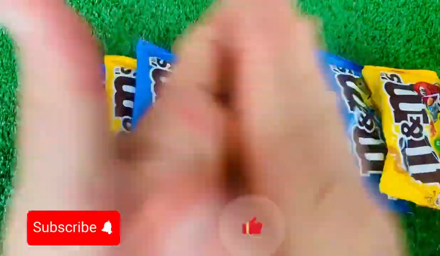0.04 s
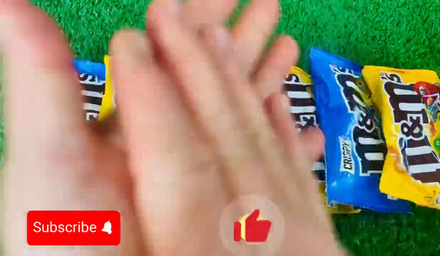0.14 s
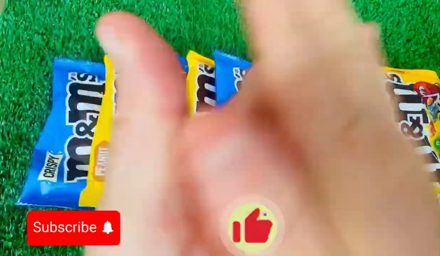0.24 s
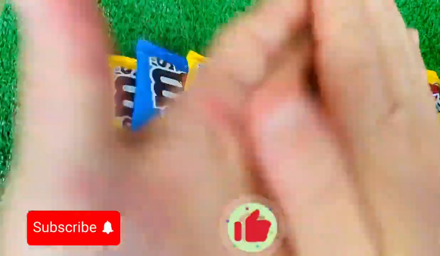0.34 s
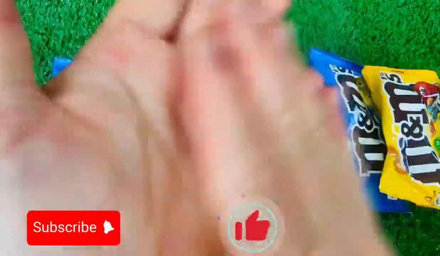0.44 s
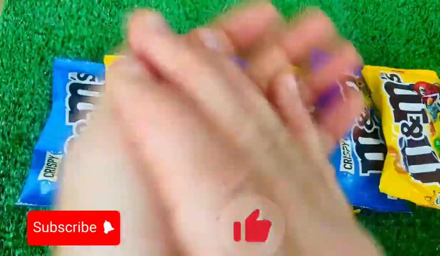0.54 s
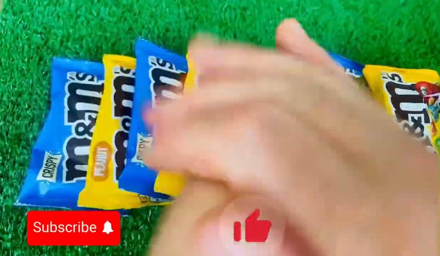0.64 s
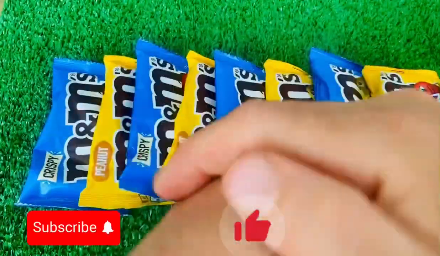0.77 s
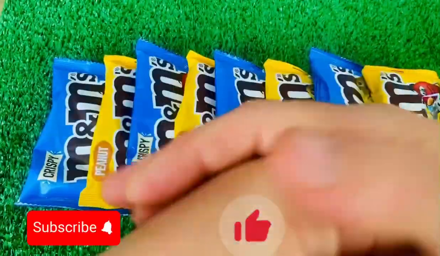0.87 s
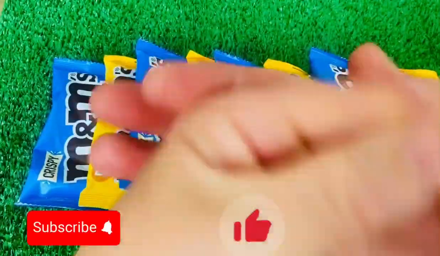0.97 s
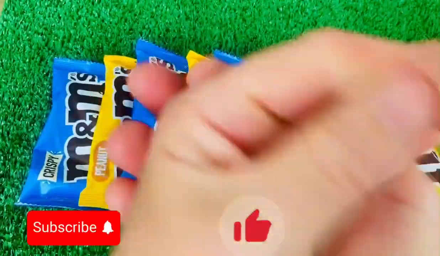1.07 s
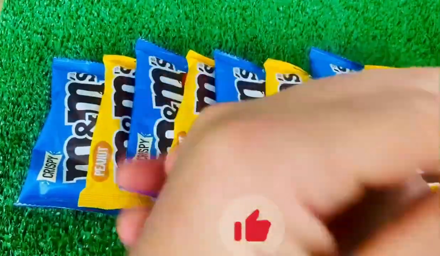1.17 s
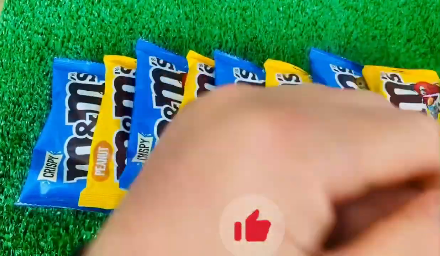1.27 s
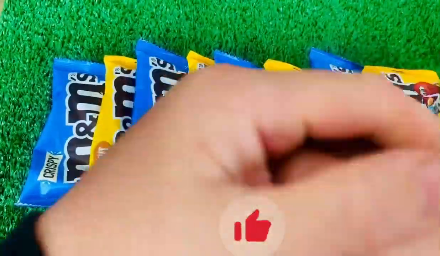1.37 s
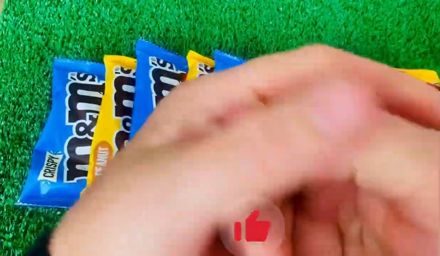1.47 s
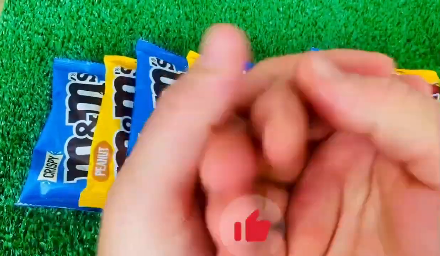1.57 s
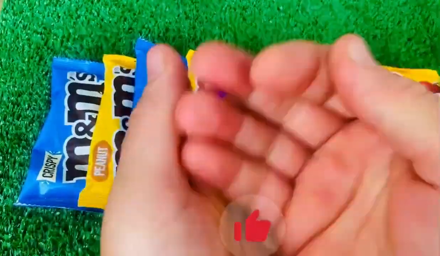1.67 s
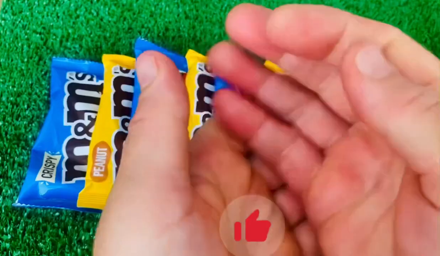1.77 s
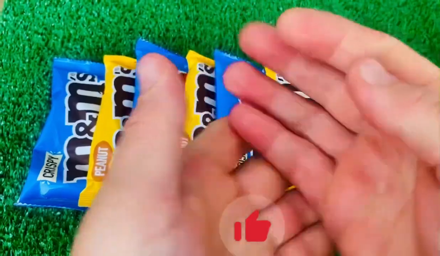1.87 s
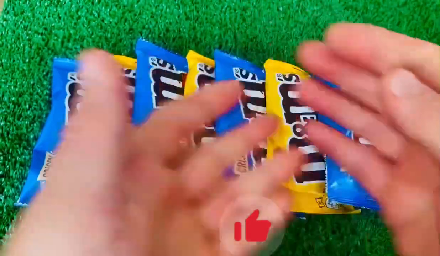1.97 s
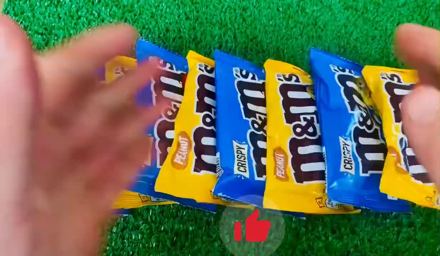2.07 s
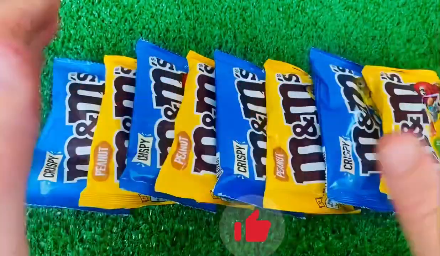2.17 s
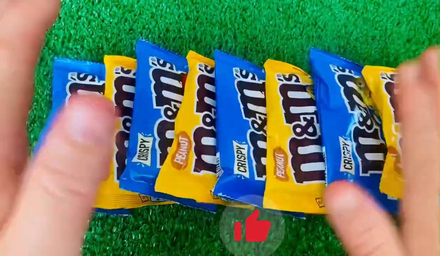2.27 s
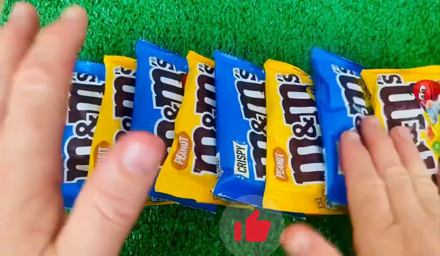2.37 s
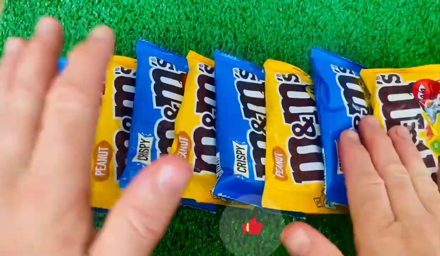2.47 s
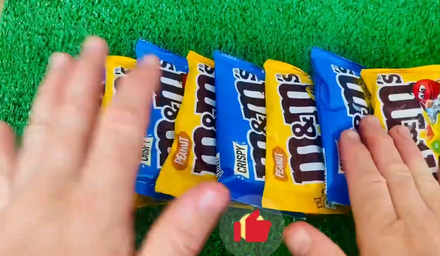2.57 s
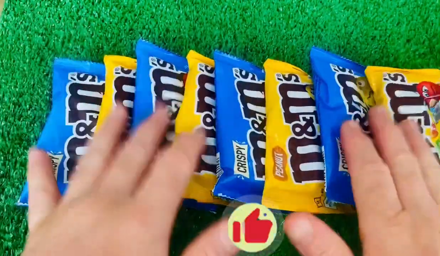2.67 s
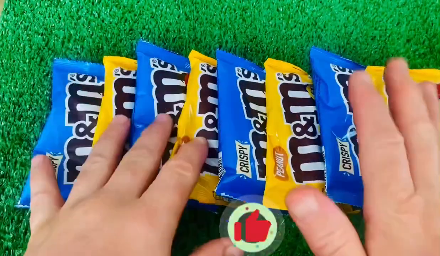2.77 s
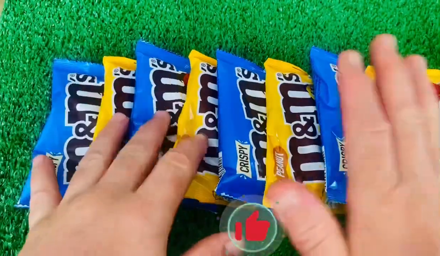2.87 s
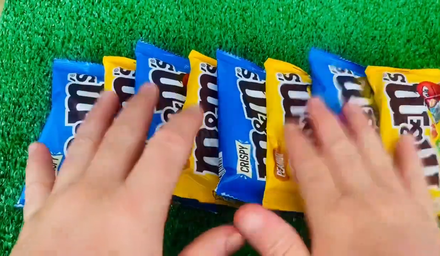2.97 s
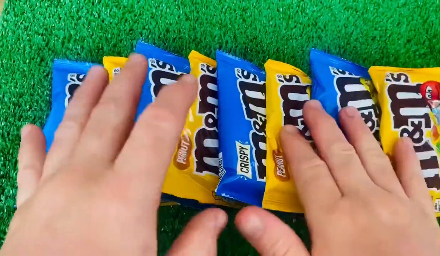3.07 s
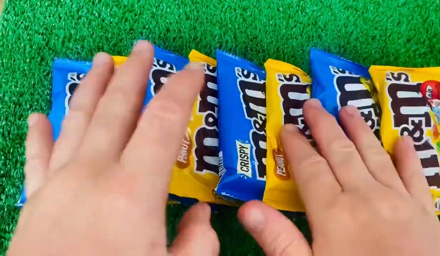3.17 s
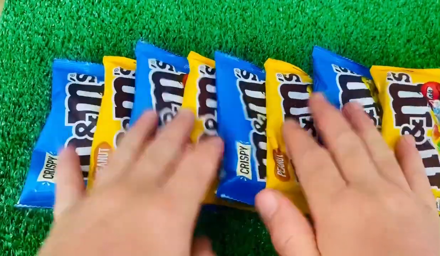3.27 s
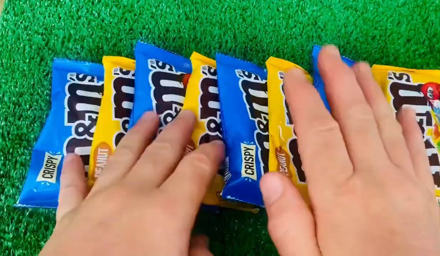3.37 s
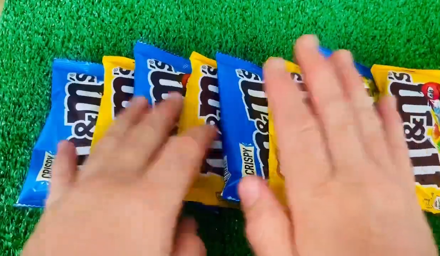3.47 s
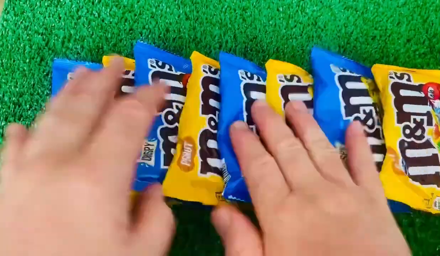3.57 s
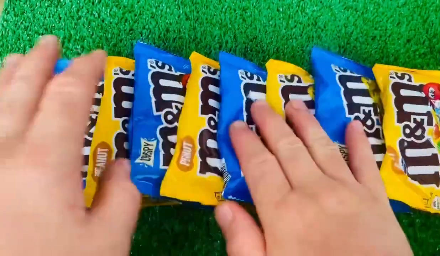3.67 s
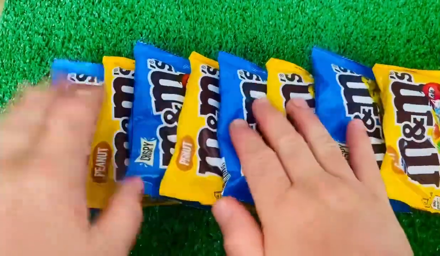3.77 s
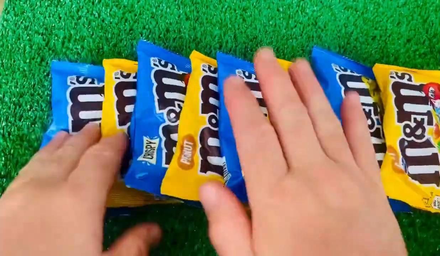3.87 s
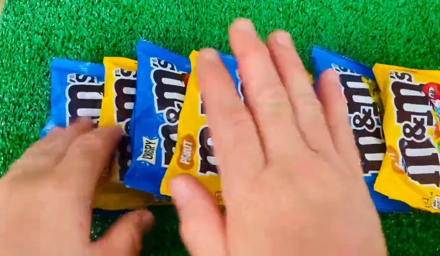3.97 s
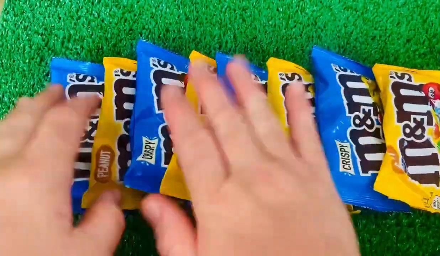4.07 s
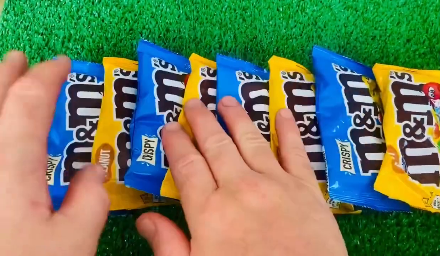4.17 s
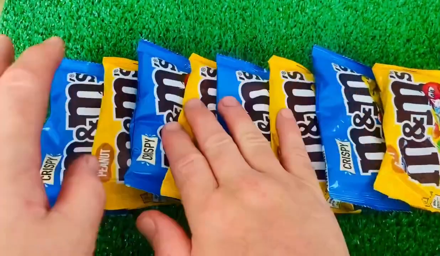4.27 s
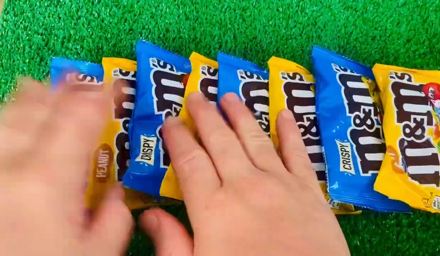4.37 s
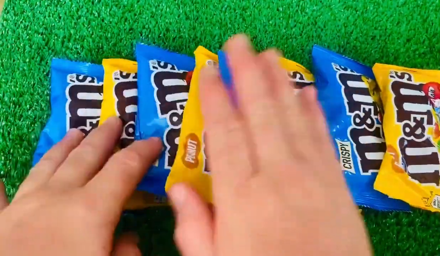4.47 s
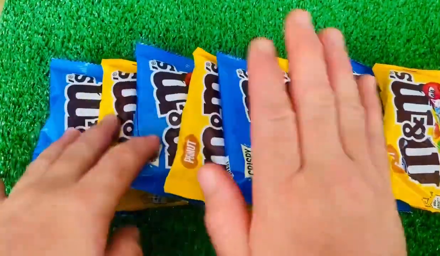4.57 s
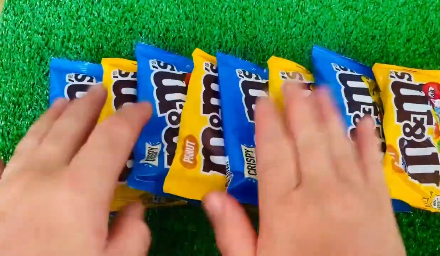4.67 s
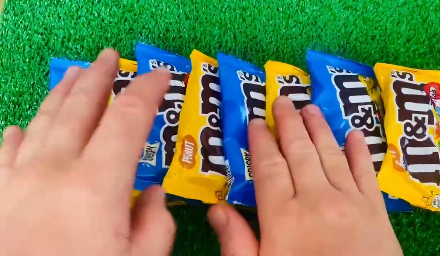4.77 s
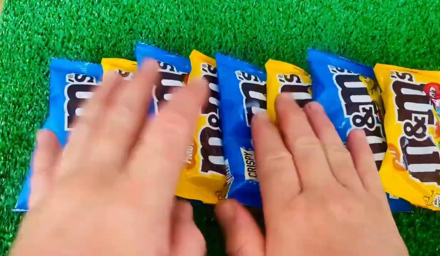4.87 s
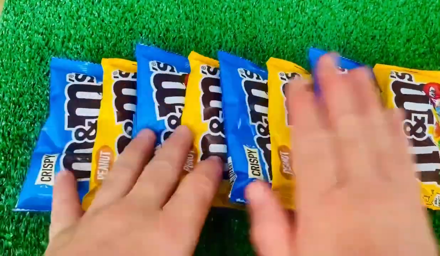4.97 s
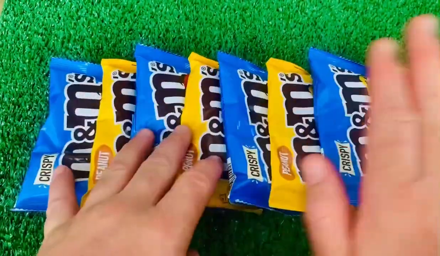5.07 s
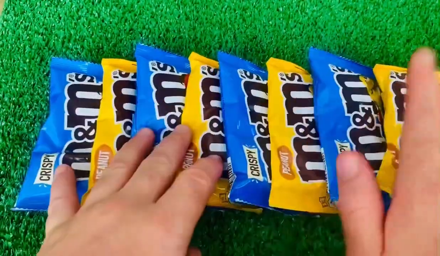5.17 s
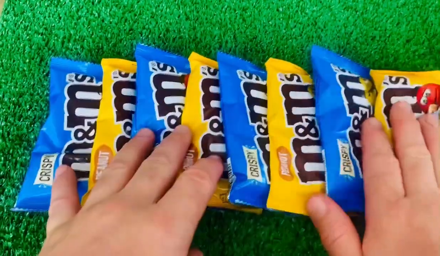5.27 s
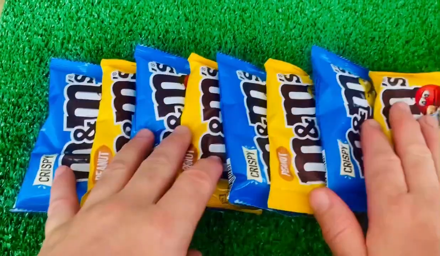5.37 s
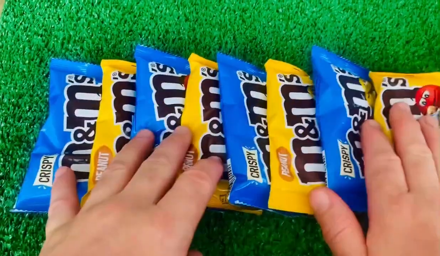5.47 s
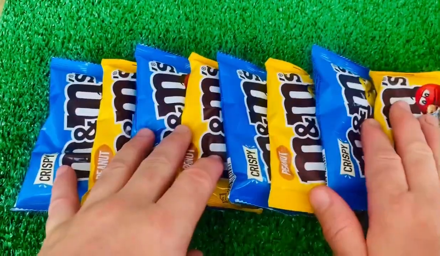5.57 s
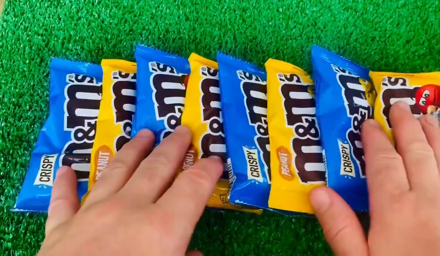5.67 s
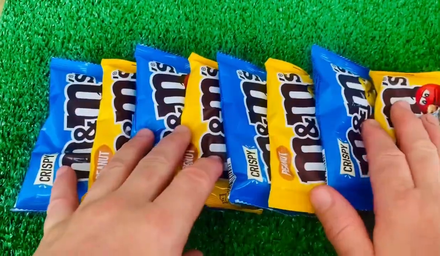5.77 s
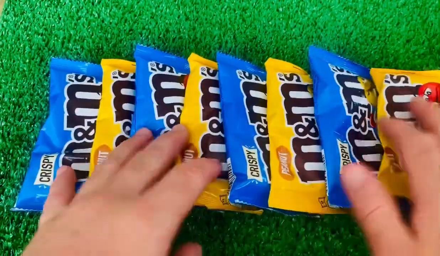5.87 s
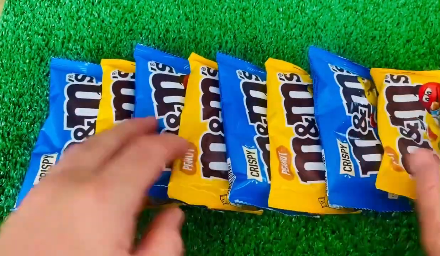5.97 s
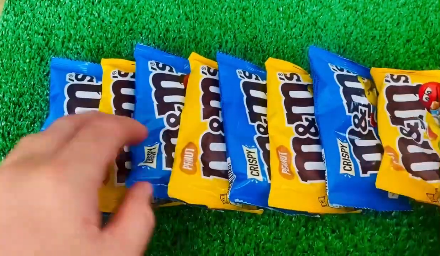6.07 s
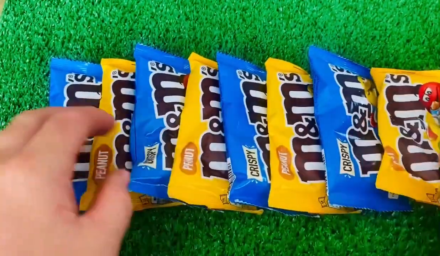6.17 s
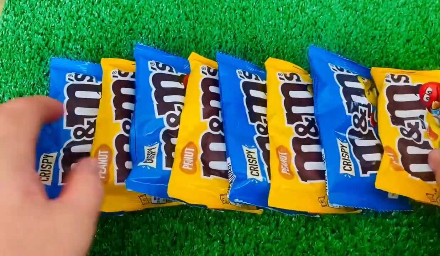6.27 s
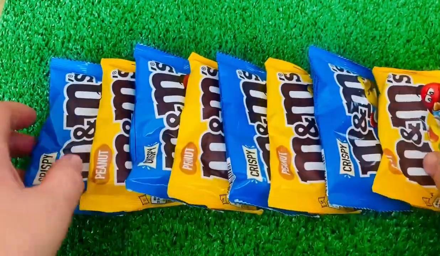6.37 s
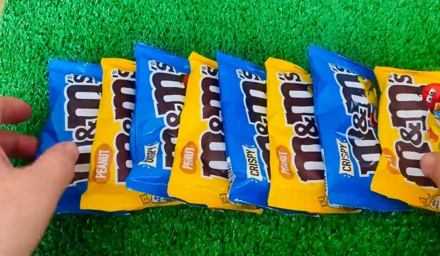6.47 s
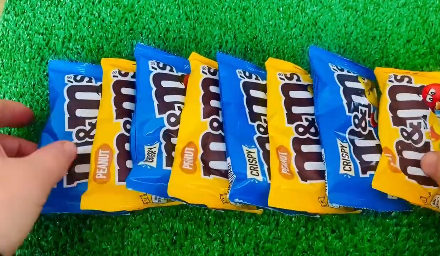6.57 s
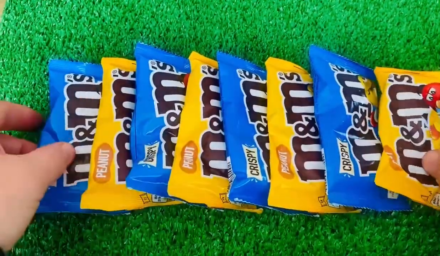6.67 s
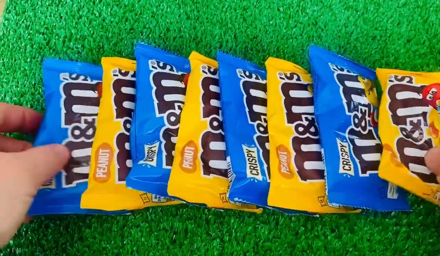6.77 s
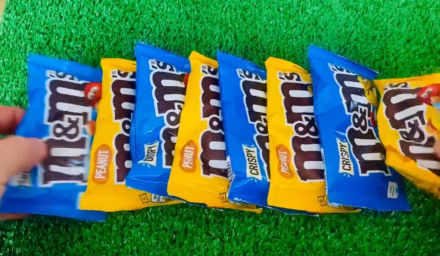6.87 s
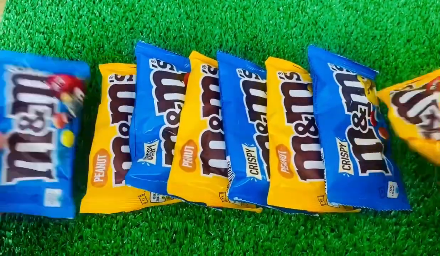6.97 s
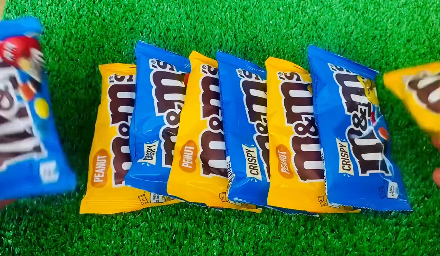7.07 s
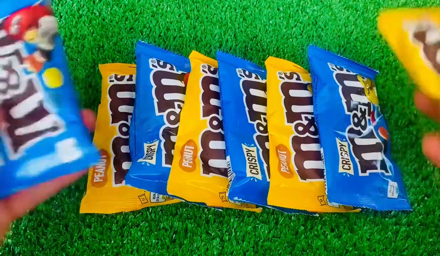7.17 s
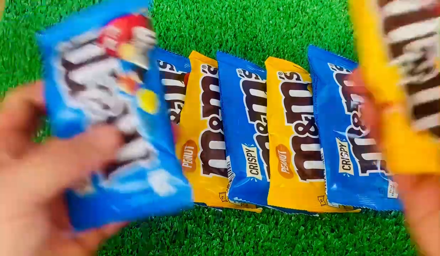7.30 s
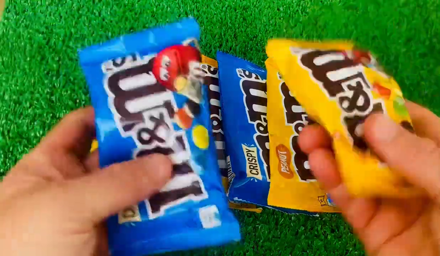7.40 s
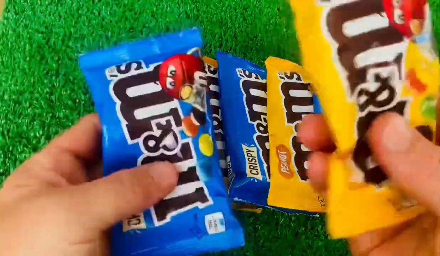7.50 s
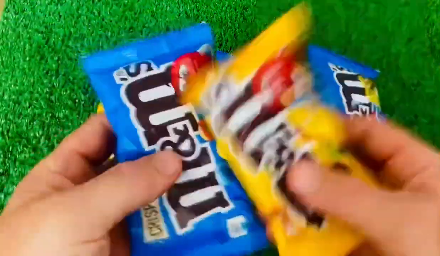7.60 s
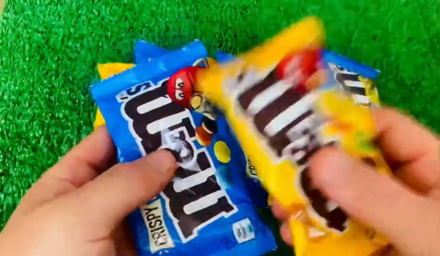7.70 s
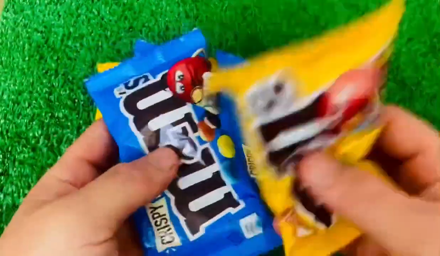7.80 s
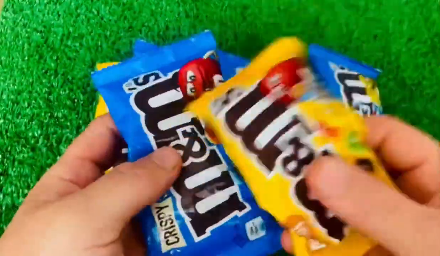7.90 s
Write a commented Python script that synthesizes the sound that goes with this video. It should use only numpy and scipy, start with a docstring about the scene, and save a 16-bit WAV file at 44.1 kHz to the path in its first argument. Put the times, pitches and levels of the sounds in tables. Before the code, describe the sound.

Soft skin-on-skin strokes come first, whispery and irregular, fading over two seconds. Next comes an even run of short, bright pats on filled plastic packets, with sweets clicking and film snapping between them. The patting stops and only tiny crinkles and a faint soft bump remain. Finally the film rustles densely as packets are picked up, and a few strong crunchy shakes end it. Intimate stereo pickup, small dry room, low room tone.

```python
"""First two palms rub together close to a stereo microphone: hissing noise, ringing in the hollow between the hands.
Then they pat a row of plastic candy packets on a soft mat. Each pat is a burst of tiny clicks ringing the film,
and the sweets inside clack as short fading tones. Between pats the film crinkles and snaps with more such clicks.
At the end two packets are picked up and shaken. Soft knocks, puffs of air, a short room tail and
a quiet room tone, all made from shaped noise, surround the hands."""
import sys
import numpy as np
from scipy import signal
from scipy.fft import rfft, irfft, next_fast_len
from scipy.io import wavfile

SR = 44100
rng = np.random.default_rng(int(sys.argv[2]) if len(sys.argv) > 2 else 0)


def materialize(psi):
    """Save the field psi as 16-bit PCM at rate SR to the path in sys.argv[1].

    A 1-D psi becomes a single channel; in a 2-D psi each row is a channel.
    """
    bounded = np.clip(np.atleast_2d(psi).T, -1, 1)
    quanta = np.round(bounded * 32767).astype(np.int16)
    wavfile.write(sys.argv[1], SR, quanta)


N = 350154  # length in samples

# pats and shakes of a packet: start_s, crush_length_s, level_db, brightness_db (above 8 kHz against below 2 kHz,
# fading after the crush), body_db (lift below 450 Hz), pouch_ring_hz, second_ring_hz
PATS = [(2.372, 0.027, -25, 2, -6, 1280, 850), (2.699, 0.018, -20, 8.5, -1.5, 1450, 300),
        (2.998, 0.01, -15, 2.5, 0.5, 1390, 880), (3.295, 0.014, -19.5, 3.5, 3, 1290, 420),
        (3.583, 0.014, -18, 1.5, -3.5, 1603, 400), (3.831, 0.012, -20, 7.5, 1.5, 1319, 430),
        (4.132, 0.012, -18.5, 7.5, -3, 1260, 370), (4.434, 0.0095, -17.5, 11.5, 1.5, 1299, 330),
        (4.714, 0.01, -15, 3, -0.5, 1906, 390), (4.968, 0.013, -22, 2, 0.5, 1241, 410),
        (5.251, 0.021, -17.5, 4, -3, 2032, 270), (6.749, 0.0094, -23, 12, -2, 2038, 350),
        (7.41, 0.012, -23.5, -1, -7.5, 1330, 400), (7.638, 0.014, -12, 7, 0, 1050, 2318),
        (7.885, 0.019, -14, 2, -2, 2330, 245)]
# tone of a pat: pitch_hz, relative_level_db (per Hz)
PAT_COLOUR = [(100, -8), (200, -2), (350, -2.5), (500, -2.5), (680, -9.5), (950, -2), (1400, -0.5),
              (2100, 0), (3000, -8), (6000, -7.5), (10000, -13), (16000, -21)]


def pats(patchy_db, pouch_db, pouch_octaves, second_db):
    """The packet gives way in a clustered burst of folds, coloured by two rings of the pouch."""
    at, sizes = grains(per_s=4500, spread_db=3.0)
    sizes = sizes * rms_one(from_db(2 * drift(150)))[at]
    power = np.zeros(len(at)) + 1e-18
    tint = np.zeros((len(at), len(FACETS_HZ)))
    for start, length, level_db, bright_db, body_db, pouch_hz, second_hz in PATS:
        age = at / SR - start
        before, after = np.minimum(age, 0), np.maximum(age - length, 0)
        # the fingers brush the film an instant before they land
        landing = np.maximum(np.exp(before / 0.0013), from_db(-17) * np.exp(before / .004))
        crush = np.maximum(np.exp(-after / 0.0053), from_db(-7.5) * np.exp(-after / .017))
        # the crush is strongest halfway through
        swell_db = 3.0 * (np.sin(np.pi * np.clip(age / length, 0, 1)) - .6)
        burst = (from_db(level_db + swell_db) * landing * crush) ** 2
        # however the folds cluster, the pat delivers the same energy
        burst *= np.sum(burst) * np.mean(sizes ** 2) / np.sum(burst * sizes ** 2)
        # each pouch has two hollow rings, and each spot on it favours facets of its own
        ring_db = 0
        for hz, db in ((pouch_hz, pouch_db), (second_hz, second_db)):
            ring_db = ring_db + db * np.exp(-(np.log2(FACETS_HZ / hz) / pouch_octaves) ** 2)
        spot_db = ring_db + patchy_db * rng.standard_normal(len(FACETS_HZ)) + body_db * BODY
        treble_db = np.outer(bright_db * np.exp(-after / 0.015), TREBLE)
        power += burst
        tint += burst[:, None] * (spot_db + treble_db)
    live = power > 1e-9
    tint_db = (tint / power[:, None])[live]  # overlapping pats share the tint by their power
    strength = (sizes * np.sqrt(power))[live]
    return film(at[live], strength, tint_db, PAT_COLOUR, cycles=18.3, smear_s=.0003)


def sweets(count=6):
    """After each pat a few sweets clack together, each at a pitch of its own near the ring of the pouch."""
    tumble_s, clack_db, fall_db_per_s = .028, -4, 272  # spread of the waits; level against the pat; weakening
    out, t = np.zeros(N + SR), np.arange(SR // 50) / SR
    for start, length, level_db, _, _, pouch_hz, _ in PATS:
        for wait, pitch in rng.standard_normal((count, 2)):
            delay = abs(wait) * tumble_s
            hz = pouch_hz * 2 ** (pitch / 2)
            at = int((start + length + delay) * SR)
            clack = np.sin(2 * np.pi * hz * t) * np.exp(-t * hz / 1.6)
            out[at:at + len(t)] += from_db(level_db + clack_db - fall_db_per_s * delay) * clack
    return out[:N]


# single creases snapping over: start_s, level_db (before gain_db), brightness_db (above 8 kHz against below 2 kHz)
SNAPS = [(2.4093, -25, 9), (2.4442, -28, 1), (2.6782, -29.5, 2), (2.971, -38, -5), (3.0319, -21, 18),
         (3.0758, -32.5, -1), (3.2444, -35, -3.5), (3.3297, -25, 2), (3.3678, -35, -12), (3.3986, -32, 6),
         (3.434, -21.5, -1), (3.4512, -24, 11), (3.4584, -23, -6), (3.6053, -20.5, -8), (3.6131, -21, -10),
         (3.6405, -22.5, 4), (3.657, -25.5, -2), (3.7647, -31.5, -4.5), (3.8515, -18.5, -2),
         (3.9947, -30.5, 6), (4.0631, -33.5, -1), (4.0999, -31.5, -14), (4.2047, -27.5, -10.5),
         (4.3873, -30.5, -2), (4.4013, -30, -1), (4.4746, -22, -28), (4.5295, -25.5, -13),
         (4.5993, -28.5, -2.5), (4.7455, -21, -3.5), (4.8997, -33.5, -9), (4.9291, -23.5, -7.5),
         (5.2803, -16.5, 3), (5.3152, -23.5, -6.5), (5.4399, -33, -7), (5.6146, -57, -25),
         (5.7617, -48, -15.5), (5.7832, -43.5, -30.5), (5.8108, -39.5, -14.5), (5.8385, -29.5, -5),
         (5.8552, -38, 14), (5.8647, -33.5, -13.5), (5.8942, -31, 13.5), (5.9154, -25.5, 5),
         (5.9465, -39, -16), (6.0106, -35, 4), (6.0366, -38.5, -5), (6.062, -38, -8), (6.1645, -41, -16),
         (6.2391, -37.5, -7.5), (6.275, -35, -7), (6.4079, -38, -8), (6.4397, -30, -2), (6.4678, -33, 2),
         (6.4962, -38, 3), (6.6568, -36, -4), (6.7001, -26, 6), (6.7305, -25, 4), (6.7447, -26, 7),
         (6.813, -32, 19), (6.8472, -23, 7), (6.8527, -26, 7), (6.8634, -25, 7), (6.8856, -22.5, 13),
         (6.8993, -21, 15), (6.935, -17.5, 17), (6.945, -26, 3), (6.9746, -30.5, -2), (6.9989, -27, -2),
         (7.0365, -31, -2), (7.0647, -24.5, 4), (7.1136, -22, 8), (7.1381, -22.5, 2), (7.175, -29.5, -2),
         (7.2259, -30, -6), (7.2972, -29, 6), (7.377, -31, -9), (7.385, -25, -8), (7.4434, -28.5, -3),
         (7.4556, -30.5, -6), (7.5437, -26.5, -2), (7.5786, -25, 5), (7.7163, -24, 1), (7.8091, -19, 6),
         (7.8172, -21.5, 6), (7.9168, -17, -6.5)]
# tone of a snap: pitch_hz, relative_level_db (per Hz)
SNAP_COLOUR = [(100, -6.5), (350, 1), (680, -6), (1200, 6), (2500, 1.5), (4000, 1), (7000, 3), (10000, -5),
               (16000, -7)]


def snaps(rows, gain_db, count=3):
    """A crease buckles in a few quick steps, each weaker than the one before."""
    s, level_db, bright_db = np.repeat(np.array(rows), count, axis=0).T
    step = np.arange(len(s)) % count
    late_s = step * 0.00087 * rng.uniform(.6, 1.5, len(s)) - .0002
    # the scale turns a level into the size of a single click
    sizes = from_db(level_db + gain_db - 2.67 * step) * np.sqrt(0.0025 * SR / 2)
    at = ((s + late_s) * SR).astype(int)
    return film(at, sizes, np.outer(bright_db, TREBLE), SNAP_COLOUR, cycles=16, smear_s=.0003)


# tone of the rustle: pitch_hz, relative_level_db (per Hz)
RUSTLE_COLOUR = [(100, -6.5), (300, 3), (480, 2), (680, -4), (1100, 1.5), (2200, 1.5), (3200, -1.5),
                 (6000, -1), (10000, -8), (16000, -19)]


def rustle():
    """Countless small creases: fine when the film settles or slides, a coarse crackle when it is flexed."""
    fine_per_s, flex_per_s = 4000, 850  # creases per second
    level_db, fine = working()
    at, sizes = grains(per_s=flex_per_s * (fine_per_s / flex_per_s) ** fine, spread_db=4.0)
    # creases come in clumps, and the facets that answer keep changing
    sizes = sizes * from_db(level_db[at] + 1.5 * drift(60)[at])
    patches = rng.standard_normal((N // 1024 + 1, len(FACETS_HZ)))[at // 1024]
    # gentle working, below -33 dB, sounds duller
    bright_db = rng.normal(0, 5.2, len(at)) + 0.41 * np.minimum(level_db[at] + 33, 0)
    tint_db = np.outer(bright_db, TREBLE) + 3.35 * patches
    return film(at, sizes, tint_db, RUSTLE_COLOUR, cycles=18.0, smear_s=.0003)


# fingers flex the film as they lift off, press or grip: start_s, length_s, rustle_level_db
FLEXES = [(2.665, 0.022, -44.5), (2.89, 0.026, -40.5), (3.365, 0.035, -39), (3.63, 0.027, -42),
          (3.79, 0.041, -38), (3.885, 0.034, -45), (3.985, 0.033, -43), (4.325, 0.028, -48),
          (4.385, 0.028, -42), (4.592, 0.034, -41.5), (4.9, 0.037, -46.5), (5.825, 0.05, -47),
          (6.05, 0.022, -47), (6.445, 0.082, -47), (6.82, .18, -32.5), (7.122, 0.016, -39.5),
          (7.21, 0.048, -38), (7.385, 0.074, -38.5), (7.545, 0.073, -37.5), (7.66, 0.045, -29.5),
          (7.78, 0.19, -29.5)]
# hands rest on the packets, then slide round them and hold them: start_s, length_s, rustle_level_db
CONTACTS = [(2.397, 3.2, -69), (5.8, .88, -52.5), (6.695, 1.4, -49)]


def working():
    """How hard the film is worked (dB), and the share of it that is settling or sliding, not flexing."""
    rise_db_per_s, fall_db_per_s = 651, 266
    # crushed film settles after a pat; a stronger pat lifts this by only part of its extra strength
    settles = [(s, 0, -26.5 + .35 * level_db) for s, _, level_db, *_ in PATS]
    settling = swells(settles, rise_db_per_s=3994.5, fall_db_per_s=155)
    sliding = swells(CONTACTS, rise_db_per_s, fall_db_per_s)
    flexing = swells(FLEXES, rise_db_per_s, fall_db_per_s)
    power = settling ** 2 + sliding ** 2 + flexing ** 2
    return 10 * np.log10(power), 1 - flexing ** 2 / power


# ringing spots (facets) of the film, and how much each belongs to the treble and to the body of the sound
FACETS_HZ = np.geomspace(75, 15500, 42)
TREBLE = np.clip(np.log2(FACETS_HZ / 4000), -1, 1) / 2
BODY = np.clip(np.log2(900 / FACETS_HZ), 0, 1)
# how differently a crease reaches the two sides: pitch_hz, side_minus_mid_db
CREASE_WIDTH = [(100, -24.5), (330, -22.5), (680, -1.5), (1050, -22), (1900, -28), (2900, -5),
                (5000, -13.5)]


def film(at, size, tint_db, colour, cycles, smear_s):
    """Clicks of energy size^2 ring the film's facets: short, broad resonances, struck anew by every click."""
    # every crease has a pitch of its own, set by the size of the facet that flips
    own_hz = rng.choice(FACETS_HZ[BODY == 0], (len(at), 1))
    own_db = 6 * np.exp(-(np.log2(FACETS_HZ / own_hz) / 0.18) ** 2)
    shares = from_db(at_hz(colour, FACETS_HZ) + tint_db + own_db) * np.sqrt(FACETS_HZ)
    chance = rng.standard_normal((len(at), 3, len(FACETS_HZ)))
    strengths = shares * chance[:, 0]
    scale = size / np.sqrt(np.sum(strengths ** 2, axis=1))
    sideways = shares * chance[:, 1] * from_db(at_hz(CREASE_WIDTH, FACETS_HZ))
    # a fold runs across the film, so the facets start at slightly different moments
    late = (np.abs(chance[:, 2]) * smear_s * SR).astype(int)
    starts = np.clip(at[:, None] + late, 0, N - 1)
    out = np.zeros((2, N))
    for k, hz in enumerate(FACETS_HZ):
        left, right = [np.bincount(starts[:, k], scale * (strengths[:, k] + side * sideways[:, k]), N)
                       for side in (1, -1)]
        t60_s = min(cycles / hz + 0.00034, .05)  # time to fade by 60 dB
        r, w = from_db(-60 / (t60_s * SR)), 2 * np.pi * hz / SR
        b = np.sqrt((1 - r * r) / 2) * np.array([1, 0, -1])
        out += signal.lfilter(b, [1, -2 * r * np.cos(w), r * r], np.array([left, right]) + 1e-18)
    return out


def grains(per_s, spread_db):
    """Random click times and their uneven sizes, scaled to a mean power of 1."""
    per_s = np.broadcast_to(per_s, N)
    at = np.flatnonzero(rng.random(N) < per_s / SR)
    sizes = rms_one(from_db(spread_db * np.minimum(rng.exponential(1, len(at)), 4)))
    return at, sizes * np.sqrt(SR / per_s[at])


# strokes of palm over palm: start_s, length_s, hiss_level_db, hollow_start_hz, hollow_end_hz, hollow_ring_db
STROKES = [(0, 0.067, -50, 3600, 3000, -18), (0.071, 0.043, -47, 2560, 1940, 12),
           (0.17, 0.048, -49.5, 1600, 1850, 6), (0.204, 0.098, -47.5, 2120, 2800, 4.5),
           (0.324, 0.18, -50.5, 3800, 4300, -23), (0.466, 0.019, -50, 4440, 2480, 13),
           (0.494, 0.019, -55.5, 2200, 2100, 19.5), (0.546, 0.15, -52.5, 1950, 1750, 9),
           (.725, 0.04, -51.5, 2200, 2310, 14), (0.806, 0.028, -60.5, 2300, 2850, 19),
           (0.834, 0.05, -53.5, 4300, 3200, 9), (0.919, 0.035, -49, 3130, 3730, 12),
           (0.97, 0.075, -57.5, 2340, 2880, 16.5), (1.068, 0.075, -65, 2790, 2700, 9),
           (1.23, 0.075, -62.5, 4400, 4400, 0), (1.328, 0.05, -64, 2420, 2450, 13),
           (1.408, 0.051, -56, 2700, 3400, 3), (1.477, 0.12, -59, 2980, 1800, -6),
           (1.623, 0.081, -58.5, 1900, 3100, 11), (1.736, 0.068, -58.5, 2900, 3970, 8),
           (1.893, 0.085, -58, 3200, 3200, -21)]
# tone of dry skin: pitch_hz, relative_level_db (per Hz)
SKIN_COLOUR = [(100, 11.5), (500, -11), (1300, -8.5), (2300, -4.5), (4500, 0.5), (8000, 4), (16000, 3)]


def palms(size=128):
    """Dry skin hisses with each stroke; the hollow between the hands rings, glides and keeps opening and closing."""
    hiss = noise(SKIN_COLOUR) * from_db(1.5 * drift(95))
    t = np.arange(0, N, size) / SR  # one setting for each block of samples
    wander = 2 ** (.04 * drift(20)[::size])
    sealed = from_db(2.5 * (drift(13.6)[::size] + 0.5))
    r = np.exp(-np.pi * 400 / SR)  # the ring is 400 Hz wide
    power, hollow = 0, np.zeros((2, N))
    for start, length, level_db, from_hz, to_hz, ring_db in STROKES:
        progress = np.clip((t - start) / length, 0, 1)
        # a stroke swells, is loudest halfway and fades
        edges_db = 513 * np.abs(t - start - progress * length)
        level = from_db(level_db + 2 * (np.sin(np.pi * progress) - .5) - edges_db)
        centre_hz = wander * from_hz * (to_hz / from_hz) ** progress
        cupped = level * sealed * from_db(ring_db)
        power, state = power + level ** 2, np.zeros((2, 2))
        for k in np.flatnonzero(level > 1e-6):
            block = slice(k * size, (k + 1) * size)
            a = [1, -2 * r * np.cos(2 * np.pi * centre_hz[k] / SR), r * r]
            b = (1 - r * r) / 2 * np.array([1, 0, -1])
            ringing, state = signal.lfilter(b, a, cupped[k] * hiss[:, block], zi=state)
            hollow[:, block] += ringing
    return hiss * np.interp(np.arange(N) / SR, t, np.sqrt(power)) + hollow


# hands knock lightly on each other or on a packet: start_s, level_db
KNOCKS = [(.643, -43), (.88, -53), (7.039, -28)]
# tone of a knock: pitch_hz, relative_level_db (per Hz)
KNOCK_COLOUR = [(350, -4), (3500, -10), (16000, -36)]
# a hand bumps softly on the mat: start_s, level_db
BUMPS = [(6.168, -49), (7.04, -58)]
# tone of a bump: pitch_hz, relative_level_db (per Hz)
BUMP_COLOUR = [(50, -14), (110, 1.5), (200, -1), (700, -23), (5000, -56)]


def thuds(rows, colour, attack_s, decay_s):
    """Damped contacts of a hand, with no ring: noise that swells quickly and dies away."""
    s, level_db = np.transpose(rows)
    age = np.arange(N) / SR - s[:, None]
    shapes = np.exp(-np.maximum(age / decay_s, -age / attack_s))
    return (from_db(level_db) @ shapes) * noise(colour)


# rubbing hands waft air at the microphone: start_s, length_s, level_db
WAFTS = [(.03, 0.06, -41.5), (.165, 0.028, -39.5), (.27, 0.04, -42.5), (.56, 0.13, -51.5)]
# tone of moving air: pitch_hz, relative_level_db (per Hz)
DRAUGHT_COLOUR = [(28, -21.5), (48, 7.5), (66, -6.5), (300, -32), (1500, -90)]


def draught():
    """Low puffs of air reach the microphone from the rubbing hands and from every pat."""
    rise_db_per_s = 354.5
    wafts = swells(WAFTS, rise_db_per_s, fall_db_per_s=200)
    pushed = [(s, length, level_db - 38) for s, length, level_db, *_ in PATS]  # 38 dB below the pat
    puffs = swells(pushed, rise_db_per_s, fall_db_per_s=68.5)
    return np.hypot(wafts, puffs) * noise(DRAUGHT_COLOUR)


def room(x, width):
    """A short diffuse tail whose treble dies first."""
    t = np.arange(SR // 2) / SR
    mid, side = rng.standard_normal((2, len(t)))
    white = mid + width * side * np.array([[1], [-1]])
    low = signal.sosfilt(signal.butter(2, 3500, fs=SR, output="sos"), white)
    high = signal.sosfilt(signal.butter(2, 3500, "high", fs=SR, output="sos"), white)
    # seconds to fade by 60 dB: 0.22 below 3500 Hz, 0.16 above
    tail = low * np.exp(-np.log(1000) * t / 0.22) - from_db(-3.5) * high * np.exp(-np.log(1000) * t / 0.16)
    tail *= np.clip((t - .002) / 0.0066, 0, 1)  # silent for 2 ms, then fades in
    return signal.fftconvolve(x, tail / np.sqrt(np.sum(tail[0] ** 2)), axes=1)[:, :N]


# tone of the quiet room: pitch_hz, relative_level_db (per Hz)
ROOM_TONE = [(25, -12), (60, -3.5), (95, 4.5), (135, -14), (200, -4.5), (320, -20.5), (600, -31.5),
             (2000, -34), (5000, -47), (16000, -55.5)]


def room_tone():
    """The steady, mostly low noise of the room, at -61.5 dB."""
    return from_db(-61.5) * noise(ROOM_TONE)


# how differently all the shaped noise reaches the two sides: pitch_hz, side_minus_mid_db
AIR_WIDTH = [(60, -27.5), (200, -15.5), (450, -0.5), (1200, -1.5), (1950, -27), (2700, -17.5),
             (4500, -12.5), (6500, -40.5)]


def noise(colour):
    """Stereo noise of a given colour, wide in the middle range and more alike elsewhere; rms 1."""
    size = next_fast_len(N)
    hz = np.arange(size // 2 + 1) * SR / size
    mid_db = at_hz(colour, hz)
    gains = from_db([mid_db, mid_db + at_hz(AIR_WIDTH, hz)])
    mid, side = irfft(rfft(rng.standard_normal((2, size))) * gains, size)[:, :N]
    return rms_one(mid + side * np.array([[1], [-1]]))


def swells(rows, rise_db_per_s, fall_db_per_s):
    """Summed loudness curve of (s, length s, dB) gestures: each rises, holds for its length and falls."""
    t, power = np.arange(0, N, 16) / SR, 1e-12
    for start, length, level_db in rows:
        rise_db = rise_db_per_s * np.maximum(start - t, 0)
        fall_db = fall_db_per_s * np.maximum(t - start - length, 0)
        power = power + from_db(level_db - rise_db - fall_db) ** 2
    return np.interp(np.arange(N) / SR, t, np.sqrt(power))


def drift(rate):
    """Slow random wandering with spread 1; a higher rate (Hz) wanders faster."""
    r = np.exp(-80 * np.pi * rate / SR)  # worked out at every 40th sample
    slow = signal.lfilter([1], [1, -2 * r, r * r], rng.standard_normal(N // 40 + 2002))[2000:]
    return np.interp(np.arange(N) / 40, np.arange(len(slow)), rms_one(slow))


def at_hz(points, hz):
    """A spectrum read on a log-frequency axis."""
    points = np.array(points)
    return np.interp(np.log(hz + 1e-9), np.log(points[:, 0]), points[:, 1])


def from_db(db):
    """Decibels to a plain factor."""
    return 10 ** (np.asarray(db) / 20)


def rms_one(x):
    """Scale to an average strength (rms) of 1."""
    return x / np.sqrt(np.mean(x ** 2) + 1e-20)


def scene():
    """Packets and palms in a small room, over puffs of air and a low room tone."""
    packets = pats(patchy_db=1.5, pouch_db=8, pouch_octaves=0.21, second_db=5.5)
    packets = packets + sweets() + snaps(SNAPS, gain_db=0.55) + rustle()
    knocks = thuds(KNOCKS, KNOCK_COLOUR, attack_s=0.00053, decay_s=0.0034)
    bumps = thuds(BUMPS, BUMP_COLOUR, attack_s=0.012, decay_s=0.099)
    close = packets + palms() + knocks + bumps
    return close + from_db(-18.0) * room(close, width=0.073) + draught() + room_tone()


# timing of the microphone pair: pitch_hz, left_lead_radians
PAIR_PHASE = [(2000, 0), (3100, .45), (5400, .15), (6700, 2.95), (8050, 3.3), (9600, 6.15), (11450, 6.5),
              (12600, 9.25), (14250, 9.5), (15500, 12.2)]
# balance of the microphone pair: pitch_hz, left_minus_right_db
PAIR_BALANCE = [(550, 0), (730, -3), (1000, 0), (2200, 0), (2800, -2), (4500, -2), (5200, 0)]


def record(dry):
    """The two sides of the microphone differ in phase and level; peaks are rounded and the top is cut."""
    headroom, cutoff_hz = .8, 15900
    size = next_fast_len(N + SR // 10)
    hz = np.arange(size // 2 + 1) * SR / size
    half = np.array([[.5], [-.5]])  # each side takes half of the difference
    phase = np.exp(1j * half * np.interp(hz, *np.transpose(PAIR_PHASE)))
    pair = from_db(half * at_hz(PAIR_BALANCE, hz)) * phase
    heard = irfft(rfft(dry, size) * pair, size)[:, :N]
    rounded = headroom * np.tanh(heard / headroom)
    return signal.sosfilt(signal.ellip(10, .2, 80, cutoff_hz, fs=SR, output="sos"), rounded)


dry = scene()
out = record(dry)
materialize(out)
```